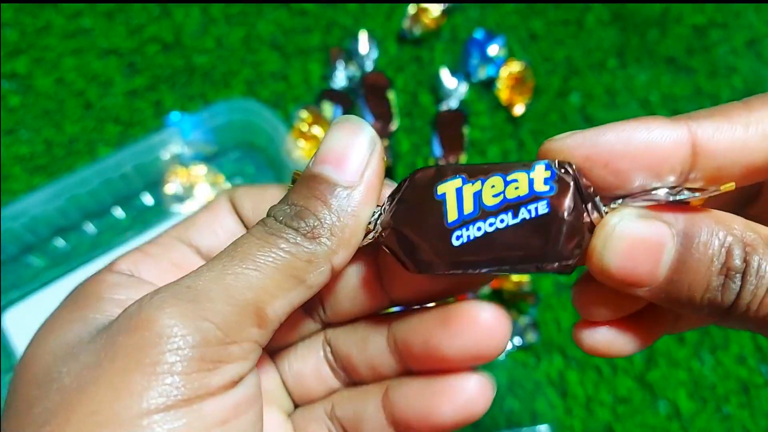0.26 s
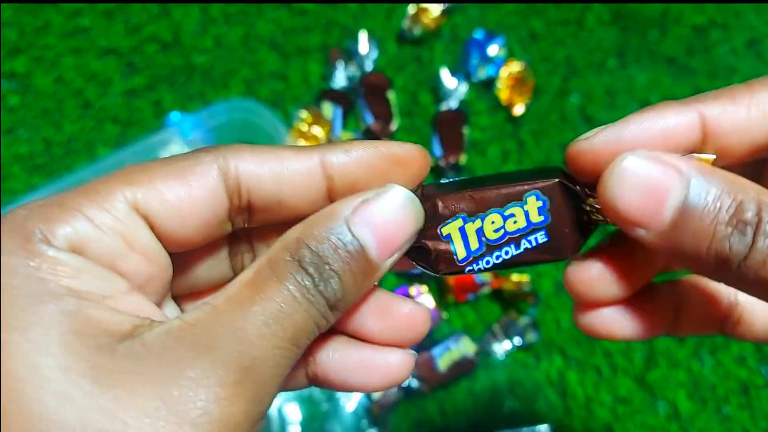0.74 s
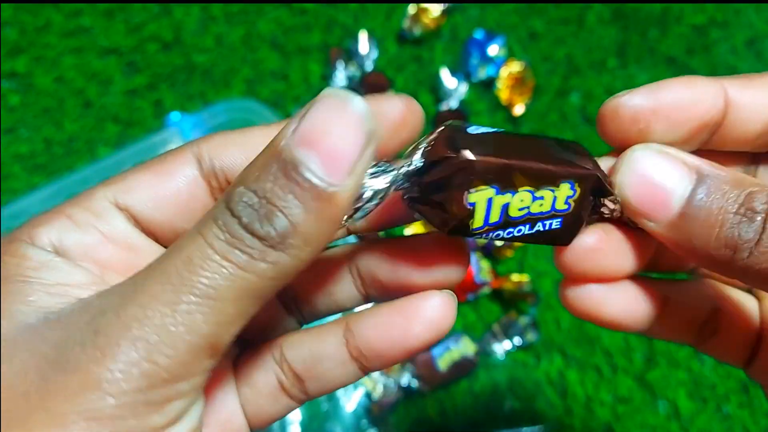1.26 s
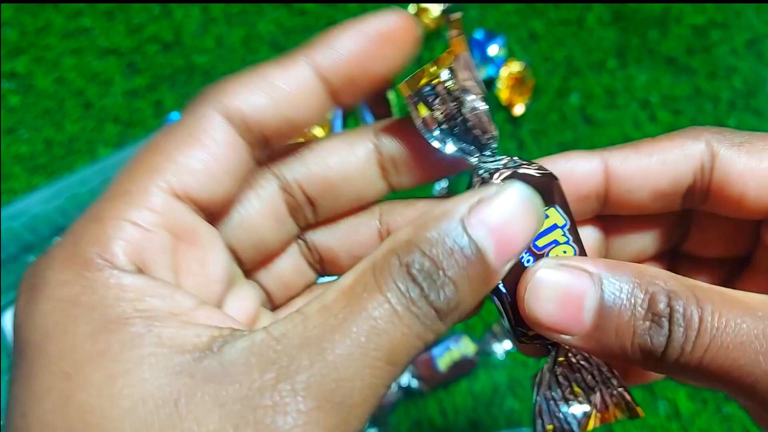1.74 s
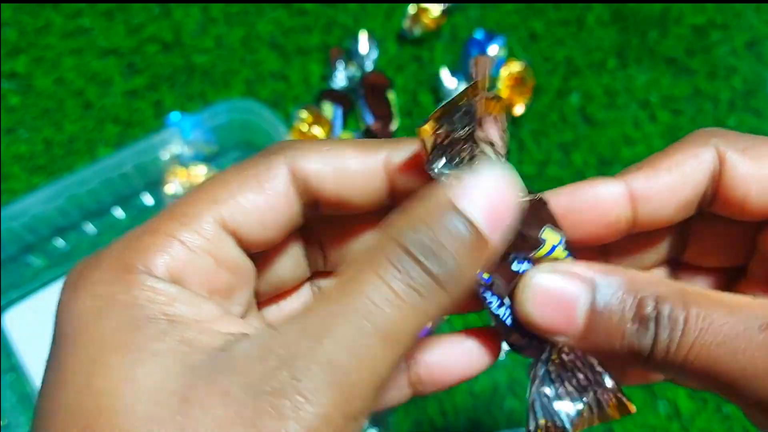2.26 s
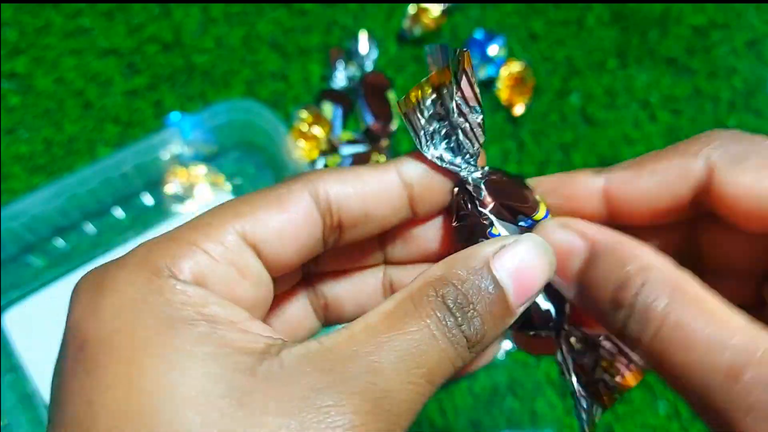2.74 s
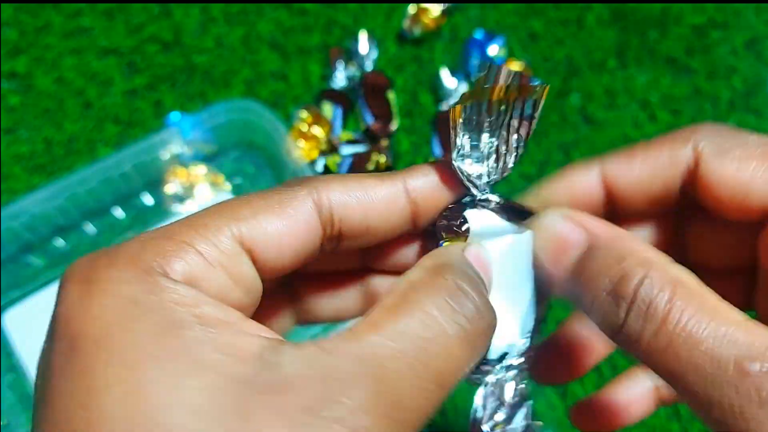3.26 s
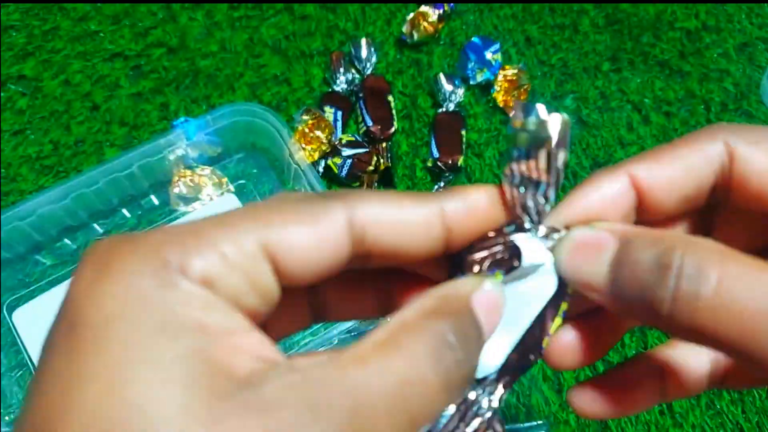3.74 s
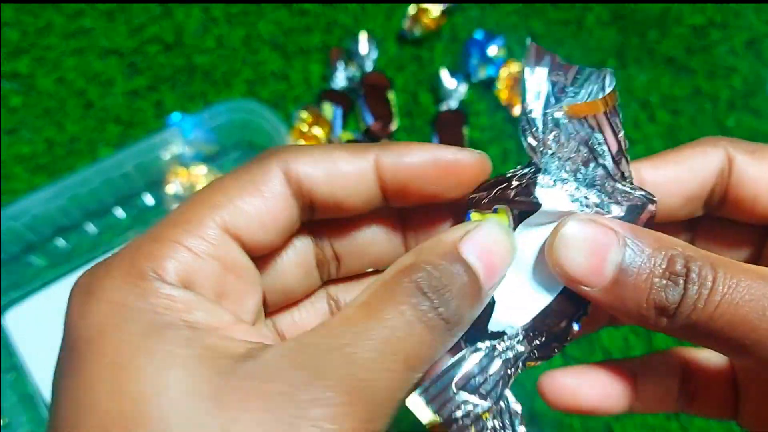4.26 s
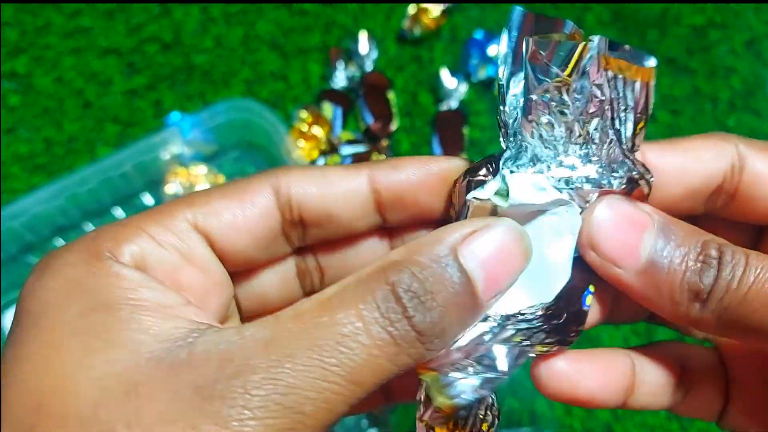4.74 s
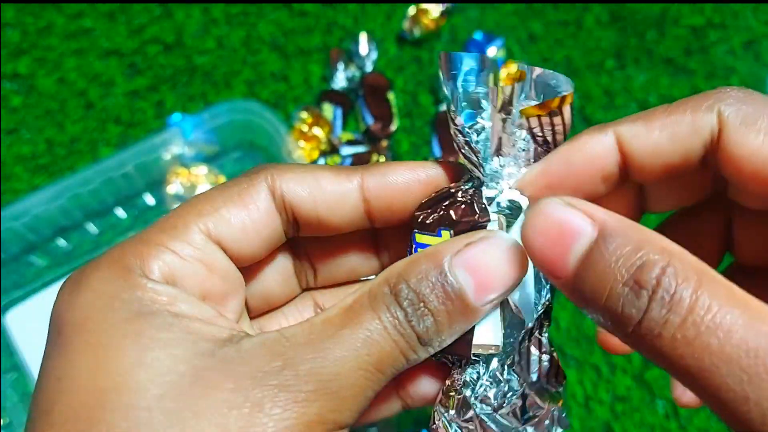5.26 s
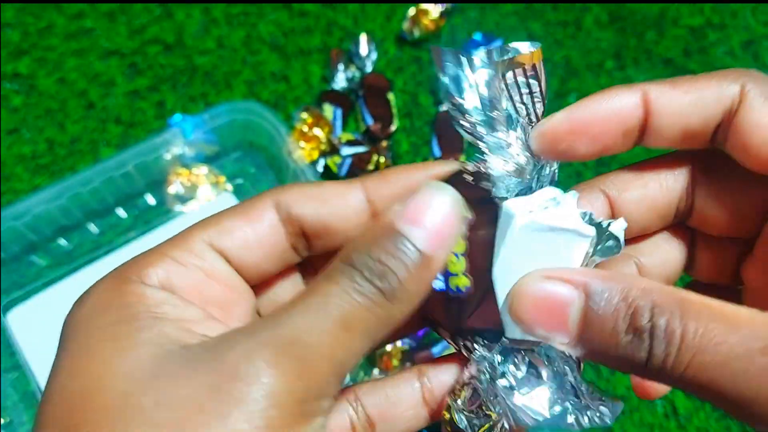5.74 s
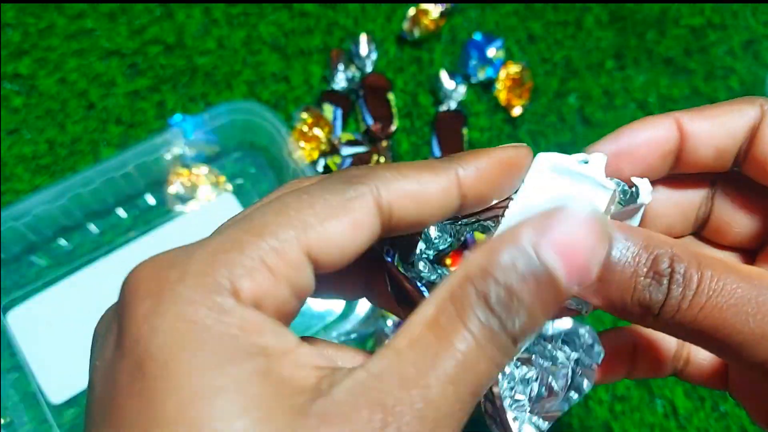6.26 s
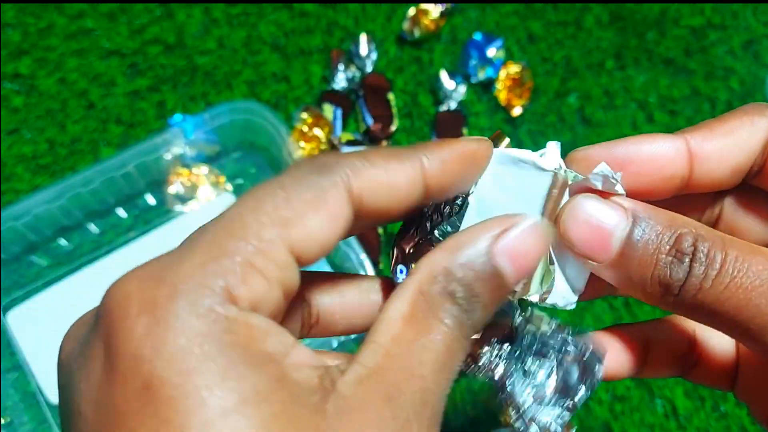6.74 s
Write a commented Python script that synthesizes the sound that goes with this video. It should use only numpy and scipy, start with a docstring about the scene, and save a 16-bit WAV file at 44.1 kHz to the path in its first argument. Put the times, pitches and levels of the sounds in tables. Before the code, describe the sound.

Close, crisp crinkling of a small foil candy wrapper: light ticks at first, then louder, fuller rattling and snaps as it opens.

```python
"""Unwrapping a foil sweet

Fingers untwist a foil sweet wrapper and peel it off, close to a phone in a small room.
Each crease that buckles gives a bright tick, a duller rattle from the facet beside it and a loose flap:
short noise bursts, filtered. Small creases crackle at random between the loud snaps. A low scuff, two
faint tones and a few dull knocks join in, over a low rumble that wavers a little and a faint hiss."""
import sys
import numpy as np
from scipy import signal
from scipy.fft import rfft, irfft, next_fast_len
from scipy.io import wavfile
from scipy.ndimage import uniform_filter1d

SR = 44100
rng = np.random.default_rng(int(sys.argv[2]) if len(sys.argv) > 2 else 0)


def transcribe(u):
    """Save the signal u as a 16-bit wav file named by the first command-line argument.

    u: samples, shape (n,) or (channels, n), limited to [-1, 1]; the rate is SR.
    q: integer samples, one column per channel.
    """
    v = np.clip(np.atleast_2d(u).T, -1, 1)
    q = np.round(v * 32767).astype(np.int16)
    wavfile.write(sys.argv[1], SR, q)


N = 308700  # samples, 7 s

# loud buckles of the foil: t/s, tick level/dB, facet level/dB, facet pitch/Hz, slipping time/ms
SNAP_EVENTS = [(0.0083, -24.5, -44, 2910, 2.1), (0.051, -22.5, -39, 2460, 4.6),
               (0.1426, -24.5, -34, 3100, 2), (0.15, -30, -31, 3080, 28), (0.1702, -26.5, -27.5, 2700, 1.8),
               (0.1764, -24.5, -33, 2880.0, 1.8), (0.2062, -23, -37, 2790, 6.2),
               (0.31, -16, -30, 2630.0, 3.4), (0.323, -17, -35, 3080, 3.9), (0.3325, -23, -30.5, 3080, 1.3),
               (0.3434, -22, -39, 2850.0, 1.9), (0.437, -22, -51, 2210.0, 3.4),
               (0.4535, -22, -31.5, 2310.0, 26), (0.4807, -33, -30, 2740, 6.1), (0.65, -28, -30, 2960, 2.5),
               (0.7229, -9.5, -22, 2570, 5), (0.739, -22, -24, 3150, 6.3), (0.8677, -17, -51, 3080, 2.0),
               (0.891, -15.5, -57, 2640.0, 5.1), (0.9044, -18, -35, 3100, 2.7),
               (0.9302, -13.5, -35, 3300, 3), (0.953, -14, -32, 2880, 3.3), (0.9663, -19, -27, 3000, 3.3),
               (0.9871, -11, -46, 3150.0, 3.4), (0.9972, -9.5, -23.5, 2860, 1.2),
               (1.0317, -10, -27.5, 3050, 1.2), (1.0412, -18.5, -49.0, 3160.0, 3.4),
               (1.117, -18, -49, 3270.0, 1.9), (1.143, -15.5, -49, 3370, 1.7),
               (1.178, -26, -30, 2760.0, 5.2), (1.229, -13.0, -25, 2860, 0.61),
               (1.2811, -22, -26.5, 3420, 2.9), (1.3675, -12.5, -51, 2980.0, 2.8),
               (1.4074, -15.5, -22, 2420, 4.6), (1.435, -7, -46, 3000, 1.8), (1.447, -22, -33, 3040.0, 8),
               (1.477, -15.5, -30.5, 2190, 6.6), (1.5527, -32, -23.5, 2820, 8),
               (1.5845, -25, -28.5, 2510.0, 0.95), (1.633, -12, -28, 2600, 5.4),
               (1.651, -28, -29, 2770, 7.5), (1.7137, -12.5, -30, 2430, 7.3), (1.7294, -35, -24, 2850, 10),
               (1.8807, -20.5, -26.5, 1920, 6.3), (2.0143, -17.5, -30, 2860.0, 10),
               (2.055, -20.5, -33.5, 2130, 16), (2.1282, -23.5, -57, 3100.0, 1.5),
               (2.1382, -18, -42, 2540.0, 2.2), (2.3582, -23.5, -57, 3050.0, 1.2),
               (2.4219, -20.5, -35.5, 2510, 8.8), (2.5033, -18.5, -64, 2710.0, 1.6),
               (2.5132, -18.5, -69, 2690.0, 4.5), (2.631, -20.5, -52, 2760.0, 2.7),
               (2.6376, -19, -30.5, 2980, 3), (2.773, -26, -31, 2720, 5.8), (2.8686, -25, -44, 2590, 4),
               (2.8816, -23, -38, 2580, 4.1), (2.9005, -18, -26, 2480, 2.6),
               (3.071, -17.5, -29.5, 2350, 12), (3.188, -5.5, -19.5, 2280, 11.3),
               (3.228, -19.5, -26, 2580, 18), (3.2614, -19.5, -41, 2500, 3.3),
               (3.275, -11.5, -23, 2650, 15), (3.2982, -6.5, -17.5, 2350, 3.9),
               (3.3375, -17, -23.5, 1970, 7), (3.357, -24, -27, 1750, 1.5), (3.4209, -20, -26.5, 1640, 20),
               (3.5183, -16.5, -27, 2290, 8.4), (3.5684, -13.5, -28, 1940, 3.0),
               (3.6598, -21, -33, 2460, 4.1), (3.8355, -19, -36, 1960, 8), (3.8652, -16, -24.5, 2830, 4.5),
               (3.933, -18, -32.5, 2540.0, 7.7), (4.0149, -3.5, -11, 2200, 19),
               (4.028, -8, -12, 2410, 11.5), (4.0387, 4.5, -24, 2620, 3), (4.0429, -7, -9.5, 2130, 12),
               (4.049, -9, -11.5, 2610.0, 9.4), (4.0536, -12.5, -14.5, 2140, 8.6),
               (4.06, -18.5, -42, 2410.0, 12.9), (4.1461, -18.5, -21.5, 1570.0, 17),
               (4.154, -10.5, -26.5, 1900, 13), (4.1628, -11, -20.5, 2400, 4.6),
               (4.1851, -19.5, -22.5, 2180, 26), (4.28, -18, -30.5, 2410, 3.8),
               (4.366, -17, -29, 3070, 8.8), (4.385, -28, -24.5, 2090, 5.9), (4.3979, -8.5, -11, 2420, 2),
               (4.4046, -31, -41, 2460, 4.4), (4.561, -20, -27.5, 2860, 6.3),
               (4.659, -19, -25.5, 2520.0, 32), (4.669, -11.5, -14.5, 2100, 11.5),
               (4.7047, -16, -21, 2320, 2.2), (4.8755, -25.5, -25, 1900, 5.1),
               (4.9067, -20.5, -31, 2470.0, 8.3), (4.915, -11, -17.5, 2880, 11),
               (5.0227, -11.5, -32, 2600, 1.6), (5.0276, -16, -16, 2100, 12),
               (5.0383, -6.5, -17.5, 2520, 13), (5.0507, -13, -19.5, 2250, 19.4),
               (5.06, -14, -16.5, 2580.0, 11), (5.072, -7.5, -16, 2150, 7.7),
               (5.0953, -7, -14.5, 1990, 8.7), (5.1023, -17, -21, 1760, 4.2),
               (5.122, -23, -12.5, 1560, 6.7), (5.1789, -12, -17, 2140, 15), (5.203, -9, -19, 2680, 9.6),
               (5.27, -10, -34, 2600, 0.73), (5.287, -13, -25.5, 2230, 1.4),
               (5.3812, -20.5, -27.5, 2900, 13), (5.4232, -10, -28.5, 2100, 10.7),
               (5.632, -7.5, -23, 2250, 5.2), (5.6423, -19.5, -59, 2150.0, 7.0),
               (5.785, -13, -18, 1530, 16), (5.7935, -12, -29.5, 1990.0, 22), (5.878, -9, -20, 2080, 2.0),
               (5.8888, -18.5, -32, 2020, 4), (5.965, -19.5, -22, 2400, 7.3),
               (5.97, -7.5, -20, 2550.0, 5.4), (6.0576, -10.5, -13.5, 2540, 11),
               (6.0663, -11, -24, 2100, 4.9), (6.0914, -6.5, -22, 2920, 3.2), (6.1, -13, -17, 2320, 2.9),
               (6.1141, -4.5, -9.5, 1400, 4), (6.1246, -14, -20, 1500, 9.2), (6.1507, -3, -20, 2530.0, 4.6),
               (6.2484, -18, -27, 2450, 12.7), (6.35, -17.5, -39, 1780, 19),
               (6.4508, -18.5, -36, 1980.0, 5.8), (6.799, -18, -30.5, 2500, 17.5),
               (6.8548, -19, -53, 2780, 7.5)]
# colour of the bright tick: f/Hz, relative level/dB
TICK_SPECTRUM = [(600, -64), (1500, -41), (2500, -0.5), (3900, -5), (4800, 5.5), (6200, 4), (7300, 4.5)]
# colour of a flat facet of foil at its reference size: f/Hz, relative level/dB
FACET_SPECTRUM = [(700, -35.5), (1400, -19.5), (1950, -8.5), (2500, -2.5), (3100, -10), (4000, -14),
                  (6000, -26.5)]
FACET_HZ = 2400  # the pitch that stands for reference size
FLAP_SHUT_DB, FLAP_OPEN_DB = -26, -6.5  # loose flaps compared with the facet rattle
LEAD = 200  # samples in a burst before its main jump


def snaps():
    """The loud buckles, each with its own levels, pitch and length: some click once, some tear on."""
    out = np.zeros(N)
    for s, tick_db, facet_db, facet_hz, slip_ms in SNAP_EVENTS:
        flap_db = facet_db + opened(s, FLAP_SHUT_DB, FLAP_OPEN_DB)
        parts = crease(slip_ms, facet_size=FACET_HZ / facet_hz, facet_spread=0.069)
        add(out, s - LEAD / SR, amp([tick_db, facet_db, flap_db]) @ parts)
    return out


def crease(slip_ms, facet_size=1, facet_spread=0.35):
    """The three parts of one buckle: bright tick, facet, loose flap; a larger facet sounds lower."""
    # colour of a loose flap: f/Hz, relative level/dB
    flap_spectrum = [(300, -21.5), (600, -12), (1100, -1.5), (1600, -11), (2200, -17.5), (3500, -34)]
    facet_spectrum = np.divide(FACET_SPECTRUM, [facet_size, 1])
    slip_s = max(slip_ms, 1) / 1000
    tick = burst(TICK_SPECTRUM, slip_s, size_spread=0.062)
    facet = burst(facet_spectrum, 2.02 * slip_s, size_spread=facet_spread)
    flap = burst(flap_spectrum, 0.01 + 1.18 * slip_s, modes_db=2.0)
    return tick, facet, flap


def burst(spectrum, t60, rise=0.33, stutter_db=7, size_spread=0.22, front=6, modes_db=4.2):
    """A crease lets go: one sharp jump in a ragged run of slips; size and chance modes colour it."""
    t = np.arange(-LEAD, 1336) / SR
    ragged = evened(uniform_filter1d(rng.standard_normal(len(t)), size=10))
    # the slips swell up to the jump, then fade 60 dB in t60 seconds
    fade_db = -60 * abs(t) / np.where(t < 0, rise * t60, t60)
    slips = rng.standard_normal(len(t)) * amp(stutter_db * ragged + fade_db)
    slips += front * (t == 0) * rng.choice([-1, 1])
    hz = np.fft.rfftfreq(len(t), 1 / SR)
    modes = np.interp(hz, np.linspace(0, SR / 2, num=56), rng.standard_normal(size=56))
    size = np.exp(size_spread * rng.standard_normal())
    gain = np.log(amp(read(spectrum, hz * size) + modes_db * modes))
    # minimum phase: the foil rings only after it is struck
    phase = signal.hilbert(np.r_[gain, gain[-2:0:-1]]).imag[:len(hz)]
    return peaked(irfft(rfft(slips) * np.exp(gain - 1j * phase)))


def crackle(per_s=720, spread_db=6.5, count=40):
    """Random small creases, a few much larger than the rest, shared out among ready-made ones."""
    rattle_shut_db, rattle_open_db = -17, -4.5  # facet rattle compared with the ticks
    swarm_tick_db, swarm_facet_db = -22.5, -19  # extra creases compared with their loud snap
    t = np.arange(N) / SR
    _, tick_db, facet_db, _, slip_ms = np.transpose(SNAP_EVENTS)
    size = amp(spread_db * np.minimum(rng.exponential(1, N), 2.6))
    size = size * (rng.random(N) < per_s / SR)  # most samples start no crease
    which = rng.integers(0, count, N)
    layers = np.zeros((3, N))
    for k in range(count):
        lean = amp(4.2 * rng.standard_normal((3, 1)))  # some creases are more tick, some more facet
        template = lean * crease(4.9 * np.exp(0.66 * rng.standard_normal()))
        layers += signal.oaconvolve(size[None] * (which == k), template, axes=1)[:, :N]
    ticks, facets, flaps = (evened(layer) for layer in layers)
    body = facets + amp(opened(t, FLAP_SHUT_DB, FLAP_OPEN_DB)) * flaps
    work = amp(handling_db(t))
    rattle = work * amp(opened(t, rattle_shut_db, rattle_open_db))
    # steady handling and swarms add as powers
    tick_level = np.sqrt(work ** 2 + swarm(tick_db + swarm_tick_db, slip_ms))
    body_level = np.sqrt(rattle ** 2 + swarm(facet_db + swarm_facet_db, slip_ms))
    return tick_level * ticks + body_level * body


def swarm(snap_db, slip_ms):
    """Power that gathers before each loud snap and settles after it; a clean click brings little."""
    gather_s, settle_s = 0.003, 0.015
    power = np.zeros(N)
    t = np.arange(-SR // 4, SR // 4 + 1) / SR
    at = np.round(np.transpose(SNAP_EVENTS)[0] * SR).astype(int)
    np.add.at(power, at, amp(snap_db) ** 2 * slip_ms / 10)
    shape = np.exp(-abs(t) / np.where(t < 0, gather_s, settle_s))
    return abs(signal.oaconvolve(power, shape, "same"))


def handling_db(t):
    """How hard the fingers work the foil, as a crackle level that is lowered in each pause."""
    # steady crackle before pauses: t/s, level/dB
    effort = [(0, -41.5), (0.65, -39), (0.92, -32.5), (1.3, -44.5), (1.55, -31.5), (1.85, -41.5),
              (2.2, -44.5), (2.55, -43), (3.05, -41), (3.3, -34), (3.6, -48), (4.1, -37), (4.3, -44),
              (4.45, -35), (4.8, -41.5), (4.96, -31), (5.1, -34.5), (5.4, -39), (5.85, -40), (6.1, -34.5),
              (6.22, -48.5), (6.4, -36), (6.52, -52), (7, -41.5)]
    # the fingers stop for a moment: start/s, length/s, change/dB
    pauses = [(0.331, 0.1, -11), (2.263, 0.15, -11), (2.648, 0.068, -22), (2.942, 0.059, -11.5),
              (3.691, 0.09, -6), (4.268, 0.041, -12), (4.478, 0.082, -13), (5.217, 0.035, -15),
              (5.711, 0.025, -10), (5.832, 0.055, -19.5), (6.668, 0.12, -6), (6.927, 0.059, -16)]
    stop_s = 0.0032  # slope at each end of a pause
    drops = 0
    for s, length, db in pauses:
        drops = drops + db * np.clip(np.minimum(t - s, s + length - t) / stop_s, 0, 1)
    return np.interp(t, *np.transpose(effort)) + drops


def opened(s, shut_db, open_db):
    """A level that follows the unfolding of the wrapper."""
    # how far the wrapper is unfolded: t/s, share/0-1
    unfolding = [(0, 0), (2.9, 0), (3.45, 0.88), (4.05, 0.61), (4.6, 0.63), (5.2, 1), (7, 0.84)]
    share = np.clip(np.interp(s, *np.transpose(unfolding)), 0, 1)
    return shut_db + (open_db - shut_db) * share


def pull():
    """The foil is dragged off the sweet: lumpy low friction noise that swells and fades."""
    # colour of the scuff: f/Hz, relative level/dB
    scuff_spectrum = [(90, -20), (250, -10), (600, -11.5), (1000, -18)]
    start_s, rise_s, hold_s, fall_s, level_db = 5.93, 0.1, 0.064, 0.13, -29.5
    lumps = amp(3.2 * evened(uniform_filter1d(rng.standard_normal(N), size=250)))
    corners = np.cumsum([start_s, rise_s, hold_s, fall_s])
    shape = np.interp(np.arange(N) / SR, corners, [0, 1, 1, 0]) ** 2
    return amp(level_db) * shape * evened(colour(lumps * rng.standard_normal(N), scuff_spectrum))


def squeak():
    """Faint short sine tones with soft ends, perhaps a finger slipping on foil."""
    # the tones: t/s, length/s, f/Hz, peak level/dB
    tones = [(5.8, .085, 200, -51), (6.75, .05, 700, -60)]
    out = np.zeros(N)
    for s, length, hz, db in tones:
        t = np.arange(0, length, 1 / SR)
        add(out, s, amp(db) * np.sin(2 * np.pi * hz * t) * signal.windows.tukey(len(t), .5))
    return out


def knocks():
    """Further buckles of the foil, from very large facets: dull low blows, each with its own pitch."""
    # the blows: t/s, level/dB, pitch/Hz
    blows = [(3.021, -42, 620), (5.911, -30, 620), (5.969, -26, 700), (6.014, -27, 550), (6.057, -15, 600),
             (6.114, -20, 1080)]
    out = np.zeros(N)
    for s, db, hz in blows:
        spectrum = np.multiply(FACET_SPECTRUM, [hz / FACET_HZ, 1])
        add(out, s - LEAD / SR, amp(db) * burst(spectrum, 0.02, size_spread=.02))
    return out


def room(x, level_db=-9):
    """Sparse reflections of random sign, each band dying at its own speed."""
    # time to die away by 60 dB: f/Hz, time/s
    decay_times = [(1500, 0.17), (6500, 0.24)]
    # colour of the reflections: f/Hz, relative level/dB
    echo_colour = [(500, -2), (2400, -8), (3900, -12.5), (5500, -2.5)]
    taps = np.zeros(SR // 2)
    at = np.arange(120, len(taps) - 20, 20)  # one reflection in every 20 samples
    taps[at + rng.integers(0, 20, len(at))] = rng.choice([-1., 1.], len(at))
    hz, t, bands = signal.stft(taps, SR, nperseg=256)
    band_db = read(echo_colour, hz)[:, None] - 60 * t / read(decay_times, hz)[:, None]
    tail = signal.istft(bands * amp(band_db), SR, nperseg=256)[1]
    return amp(level_db) * signal.oaconvolve(x, tail / np.linalg.norm(tail))[:N]


def rumble():
    """Low noise of the surroundings that wavers a little, and a faint bright hiss."""
    # colour of the rumble: f/Hz, relative level/dB
    rumble_spectrum = [(18, -44), (33, -27.5), (48, 4.5), (65, -10), (130, -2), (165, -9.5), (205, -4),
                       (270, -14.5), (340, -18.5), (460, -34), (1500, -44.5)]
    rumble_db, hiss_db = -55.5, -64.5
    waver = amp(2.94 * evened(uniform_filter1d(rng.standard_normal(N), size=4000)))
    low = amp(rumble_db) * waver * evened(colour(rng.standard_normal(N), rumble_spectrum))
    hiss = amp(hiss_db) * evened(colour(rng.standard_normal(N), TICK_SPECTRUM))
    return low + hiss


def amp(db):
    """Turns decibels into a plain multiplier."""
    return 10 ** (np.asarray(db) / 20)


def evened(x):
    """Scales a signal to an RMS (average strength) of 1."""
    return x / np.sqrt(np.mean(x ** 2) + 1e-20)


def peaked(x):
    """Scales a short sound so that its loudest millisecond has envelope 1."""
    return x / np.sqrt(2 * uniform_filter1d(x ** 2, size=44).max())


def read(points, hz):
    """Value of a spectrum table on a log-frequency axis."""
    f, value = np.transpose(points)
    return np.interp(np.log(hz + 1), np.log(f + 1), value)


def colour(x, points):
    """Filters a signal by a spectrum table."""
    size = next_fast_len(x.shape[-1])
    gain = amp(read(points, np.fft.rfftfreq(size, 1 / SR)))
    return irfft(rfft(x, size) * gain, size)[..., :x.shape[-1]]


def add(mix, s, sound):
    """Adds a sound into the mix from time s in seconds, cut off at the end of the mix."""
    part = mix[round(s * SR):][:len(sound)]
    part += sound[:len(part)]


def scene():
    """The foil sounds, their room reflections and the rumble, as two nearly equal channels."""
    foil = snaps() + crackle() + pull() + squeak() + knocks()
    mono = foil + room(foil) + rumble()
    smear = rng.standard_normal(2500) / 50
    # a faint smeared copy makes the channels differ very slightly
    apart = colour(signal.oaconvolve(mono, smear, "same"), [(100, -38), (6500, -39), (8500, -24)])
    return np.array([mono + apart, mono - apart])


def record(dry, knee=0.5):
    """A narrow microphone path; peaks over a soft knee bend towards full scale; then the band limit."""
    # microphone response: f/Hz, gain/dB
    mic_response = [(7400, 1.5), (7700, -5), (7950, -23), (8300, -41), (9500, -64)]
    edge_hz = 16200
    heard = colour(dry, mic_response)
    over = np.maximum(abs(heard) - knee, 0)
    bent = heard - np.sign(heard) * (over - (1 - knee) * np.tanh(over / (1 - knee)))
    low_pass = signal.firwin(511, edge_hz, window=("kaiser", 9), fs=SR)
    return signal.oaconvolve(bent, low_pass[None], "same")


dry = scene()
out = record(dry)
transcribe(out)
```